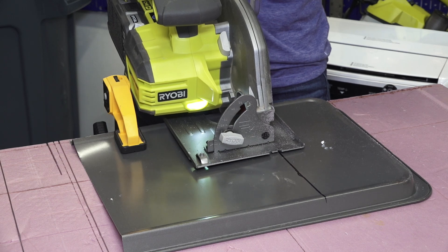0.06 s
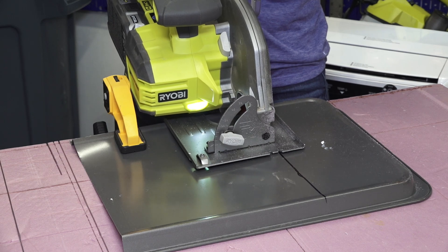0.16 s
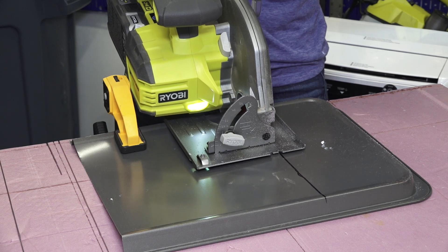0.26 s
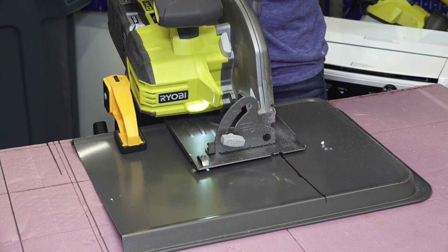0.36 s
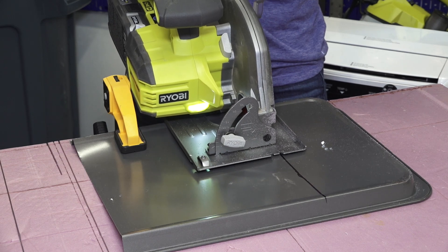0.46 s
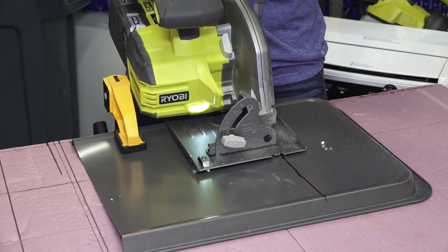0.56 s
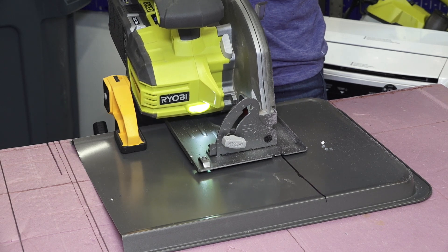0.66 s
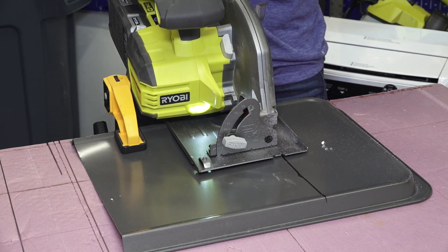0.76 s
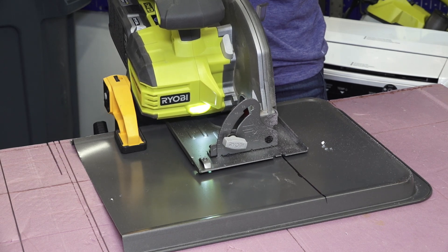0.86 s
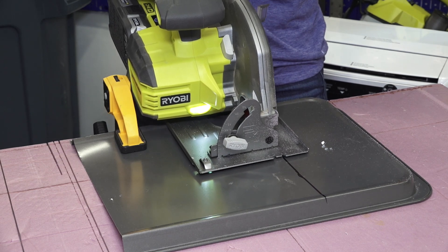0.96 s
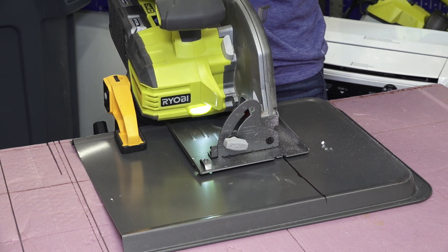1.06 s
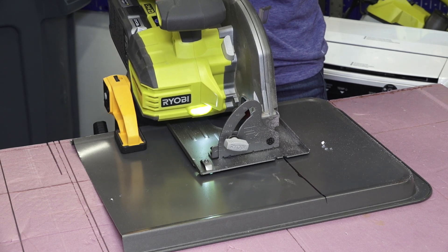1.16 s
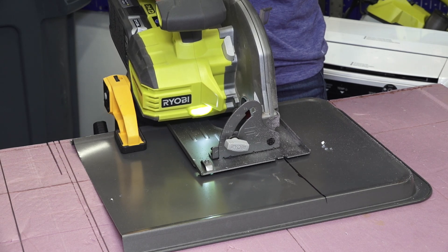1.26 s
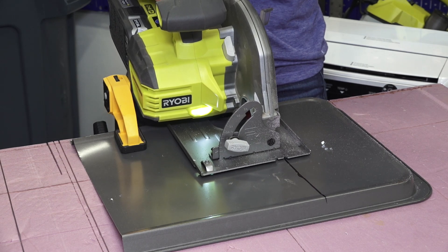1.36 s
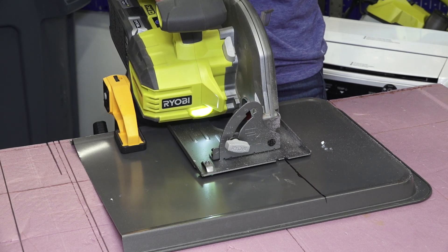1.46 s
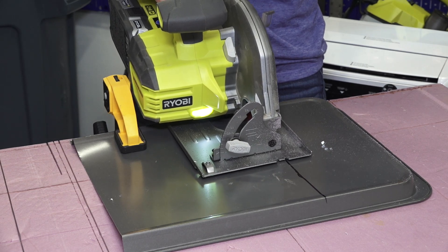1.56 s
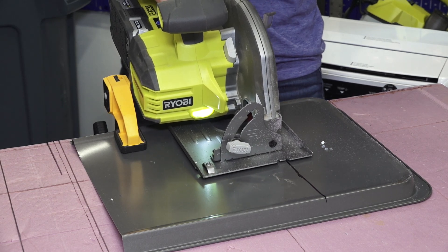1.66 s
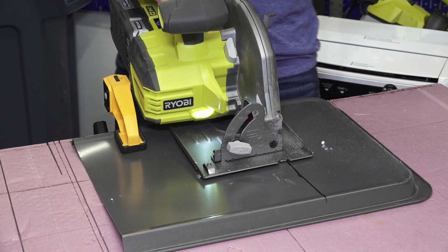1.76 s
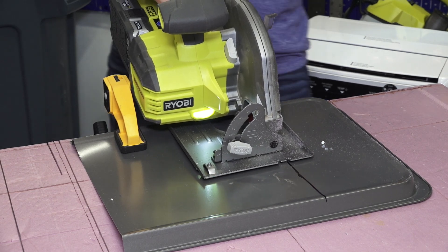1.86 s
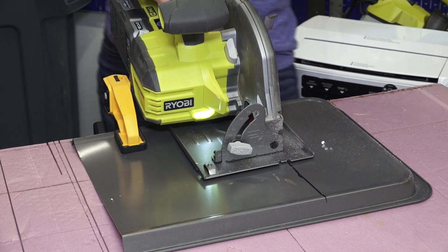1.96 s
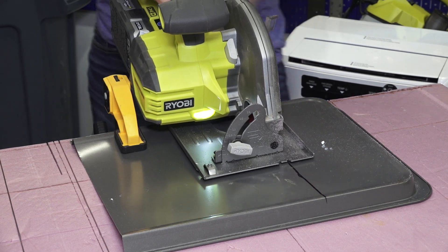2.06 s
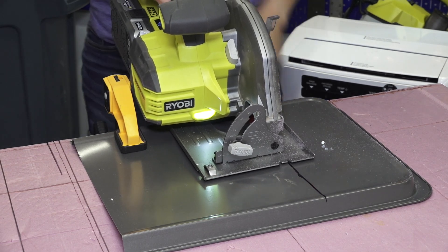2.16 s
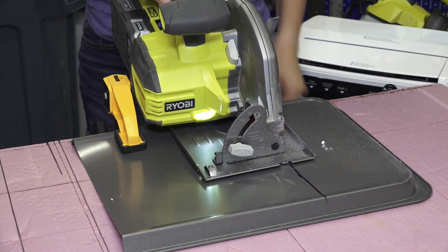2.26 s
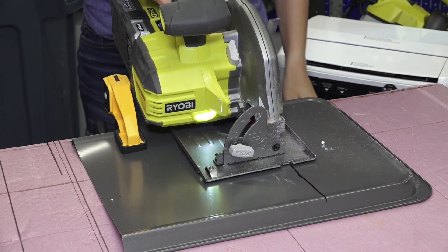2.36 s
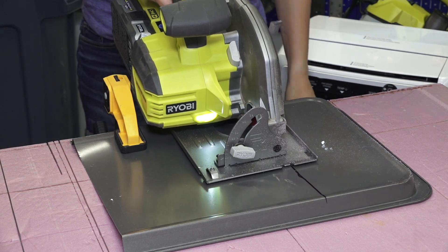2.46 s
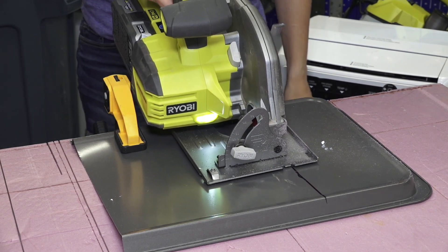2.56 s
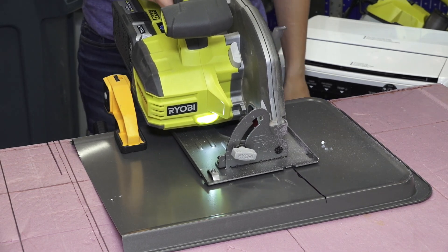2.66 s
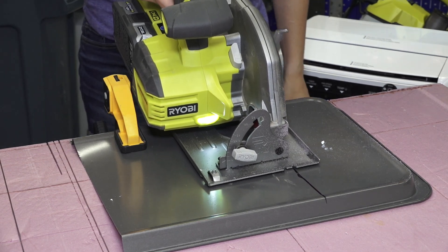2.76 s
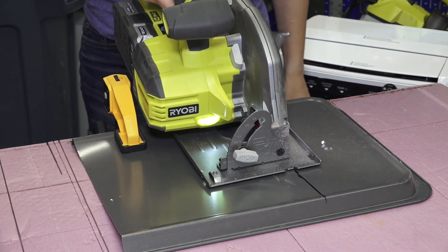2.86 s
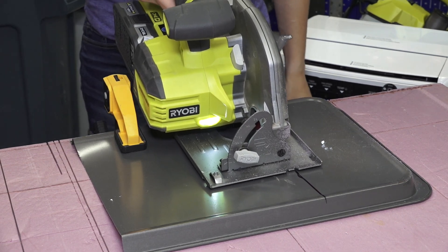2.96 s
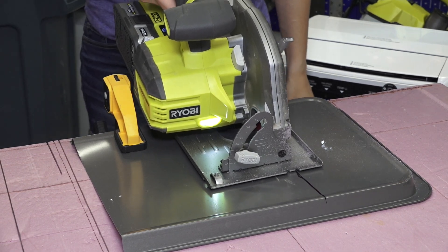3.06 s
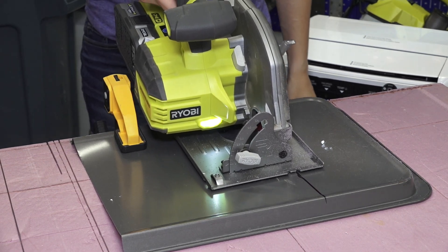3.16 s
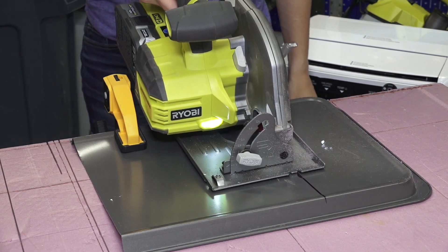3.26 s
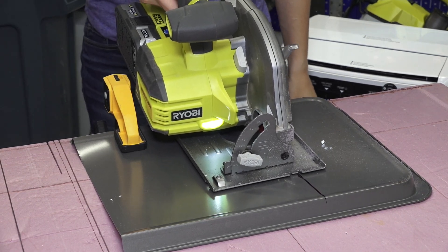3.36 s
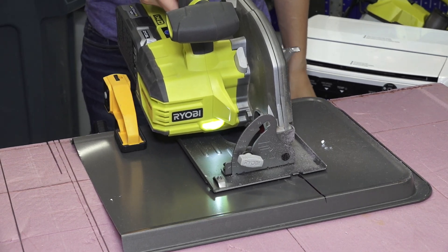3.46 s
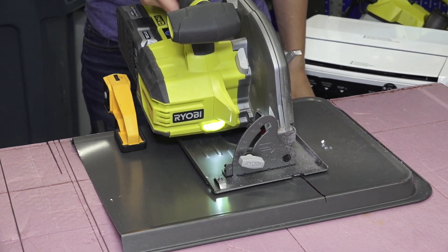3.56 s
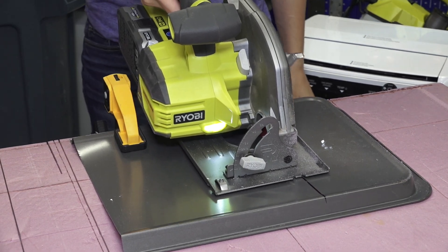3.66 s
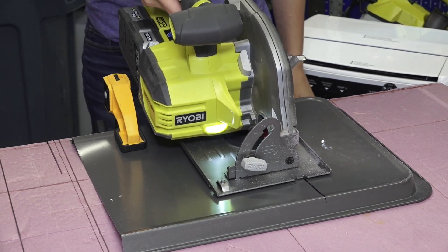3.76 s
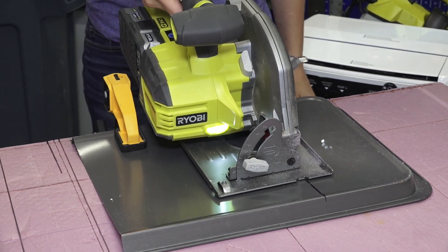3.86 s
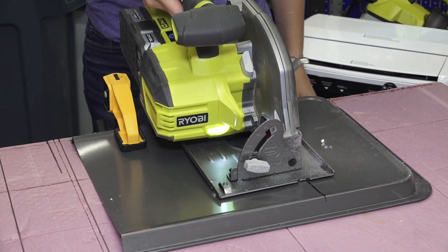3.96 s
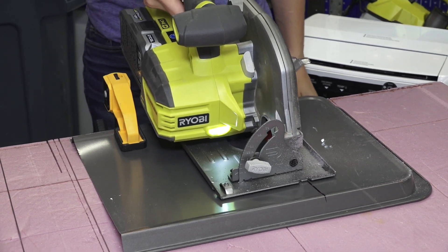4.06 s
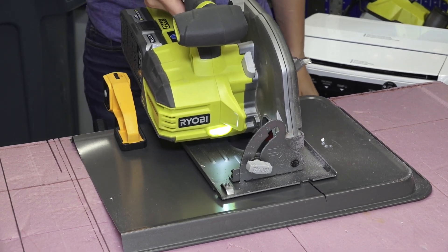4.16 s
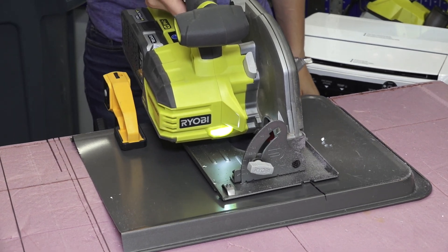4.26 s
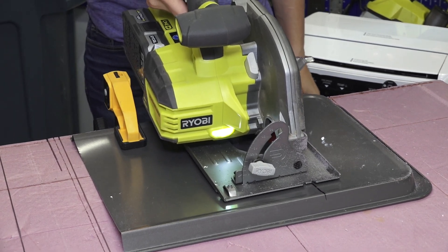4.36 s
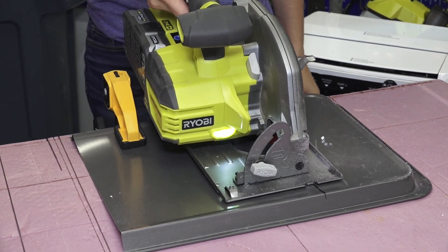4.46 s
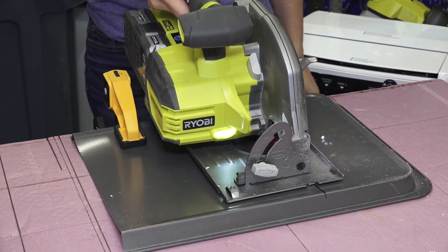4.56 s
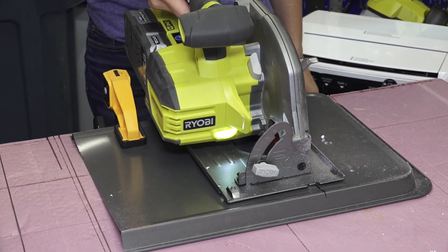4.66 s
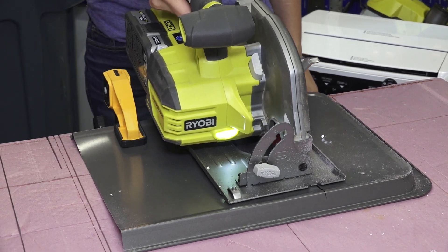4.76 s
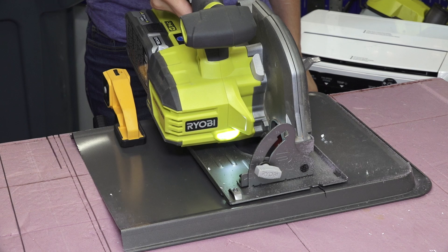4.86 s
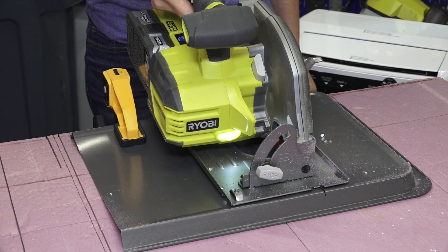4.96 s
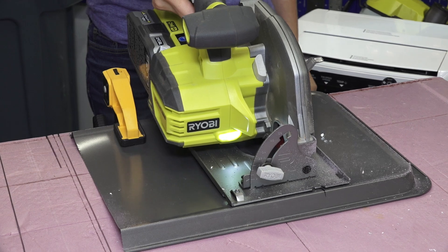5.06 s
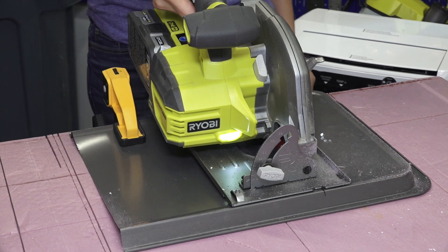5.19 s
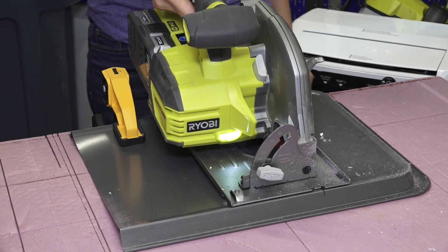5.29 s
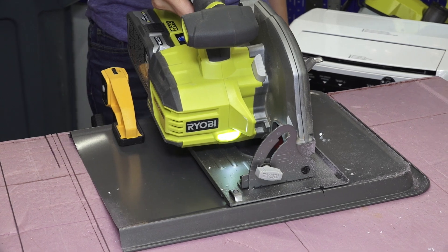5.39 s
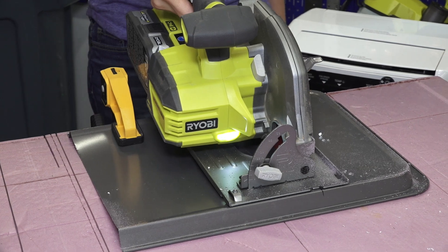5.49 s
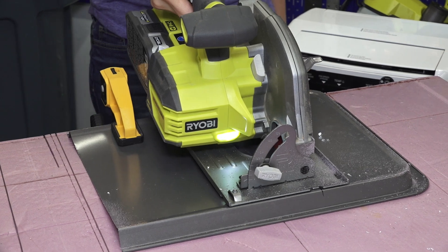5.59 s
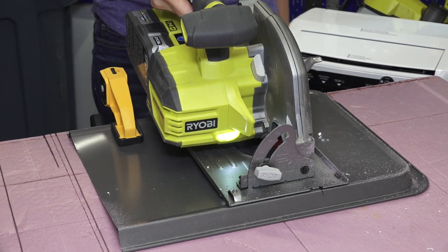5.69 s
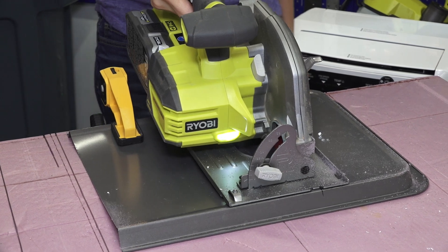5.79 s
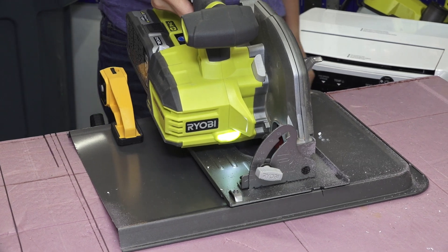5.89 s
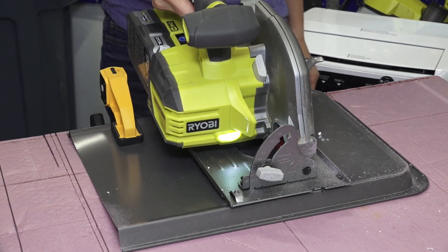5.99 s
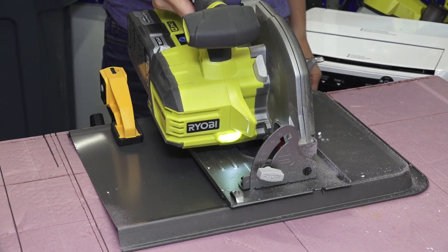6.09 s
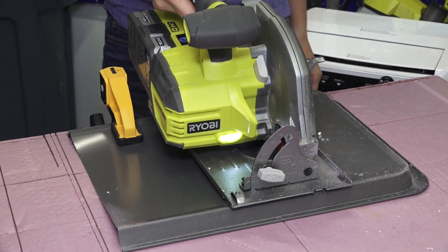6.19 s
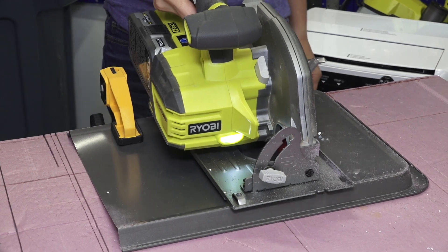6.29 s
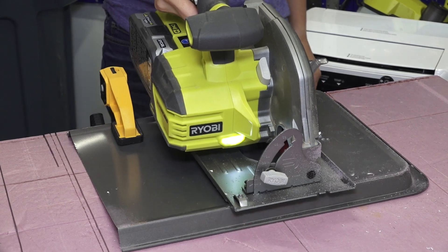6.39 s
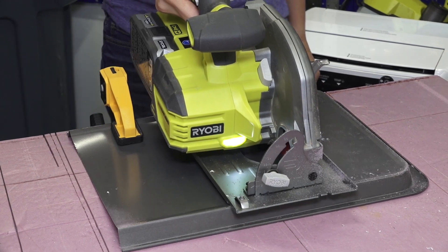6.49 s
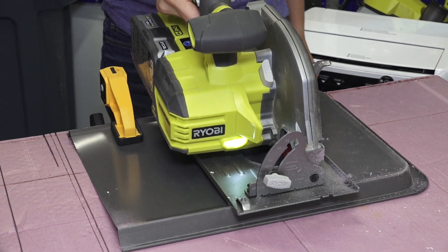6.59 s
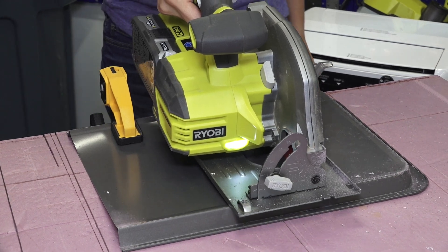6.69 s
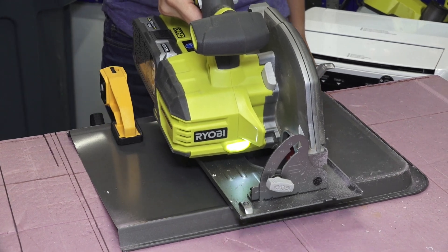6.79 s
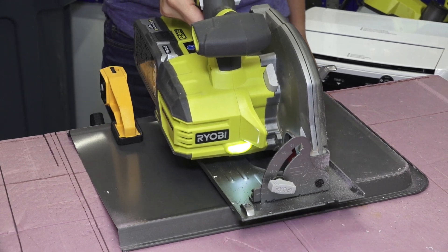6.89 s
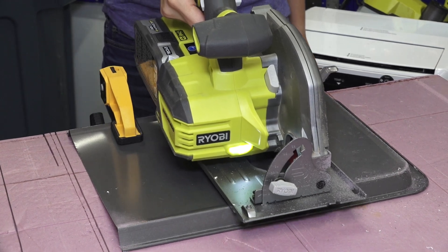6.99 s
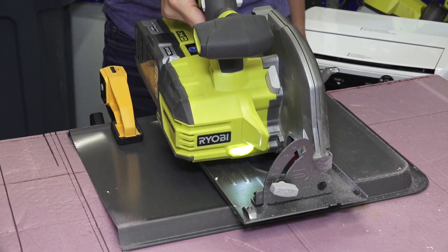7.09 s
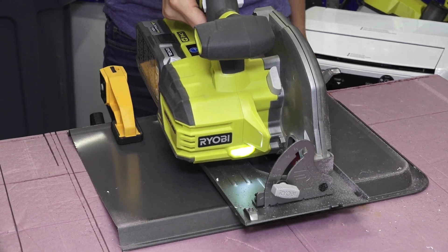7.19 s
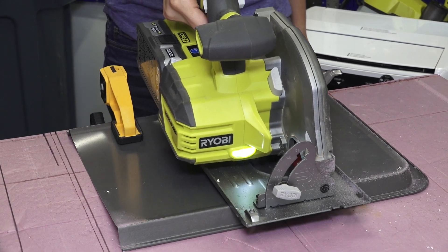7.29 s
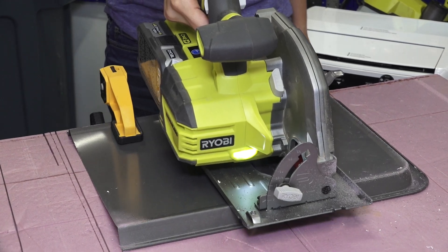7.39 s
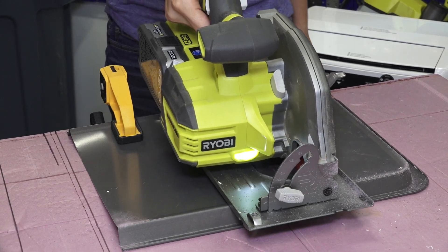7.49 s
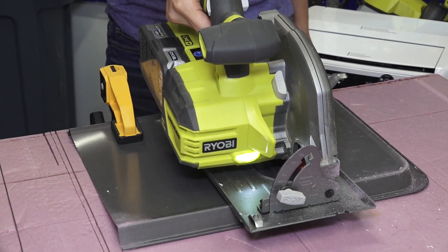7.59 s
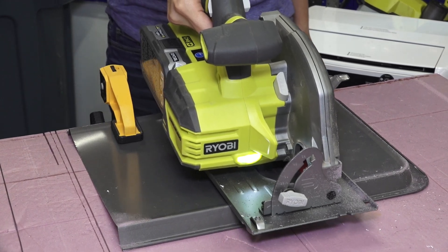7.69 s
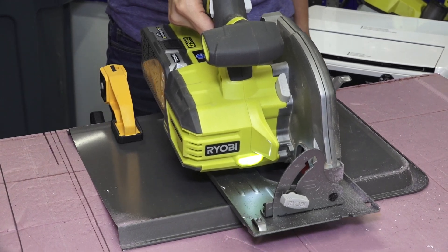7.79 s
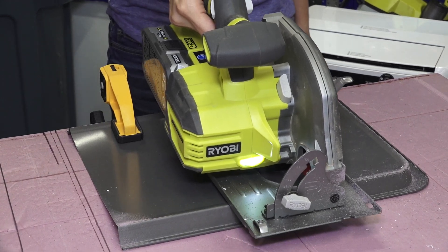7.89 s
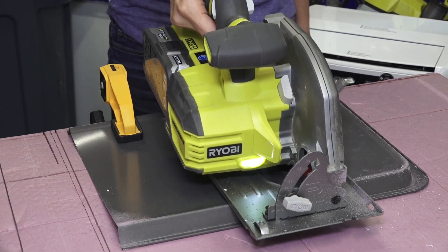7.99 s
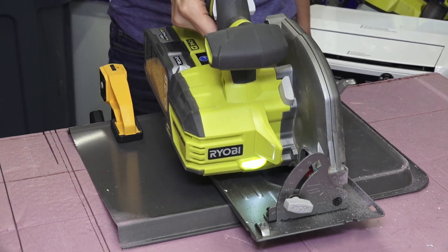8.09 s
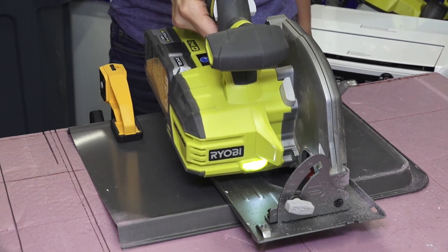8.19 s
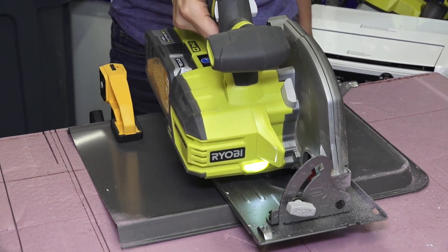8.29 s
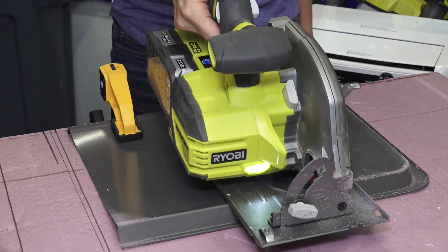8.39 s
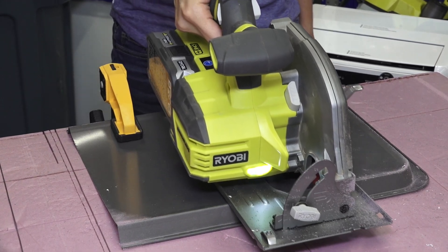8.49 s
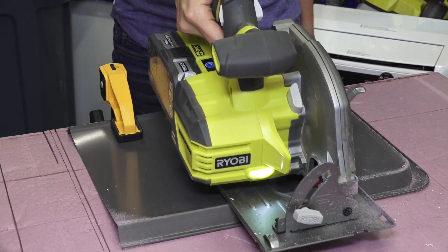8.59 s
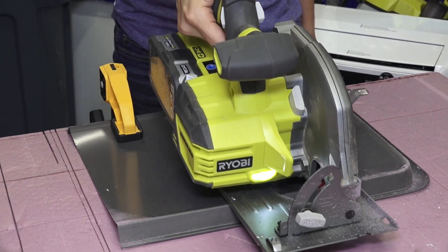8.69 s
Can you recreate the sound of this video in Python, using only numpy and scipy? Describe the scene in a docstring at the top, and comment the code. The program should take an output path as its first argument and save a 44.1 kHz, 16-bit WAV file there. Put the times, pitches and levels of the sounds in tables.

```python
"""Circular saw cutting a steel pan

A cordless saw with a 48-tooth blade is pushed through a thin steel pan in a small workshop, heard close up.
The teeth strike the sheet and whine; unequal teeth and blade wobble repeat every turn, so it buzzes
and throbs. As the blade bites deeper it slows, the chips rasp louder and the pan rattles."""
import sys
import numpy as np
from scipy import signal
from scipy.fft import rfft, irfft, next_fast_len
from scipy.io import wavfile
from scipy.ndimage import uniform_filter1d, minimum_filter1d, map_coordinates

SR = 44100
rng = np.random.default_rng(int(sys.argv[2]) if len(sys.argv) > 2 else 0)


def generate_wav(signal):
    """Clip the signal to [-1, 1] and save it as 16-bit WAV at the path in sys.argv[1]."""
    frames = np.transpose(np.atleast_2d(signal))
    scaled = np.clip(frames, -1, 1) * 32767
    pcm = np.round(scaled).astype(np.int16)
    wavfile.write(sys.argv[1], SR, pcm)


N = 385434
TIME = np.arange(N) / SR
TEETH, MAX_TURNS = 48, 512
FEED_CHANGES_PER_S = 15  # the hand pushes unevenly


def undb(db):
    """Turn decibels into a gain."""
    return 10 ** (np.asarray(db) / 20)


def curves(table):
    """Join the points of each column with straight lines in time."""
    times, *columns = np.transpose(table)
    return [np.interp(TIME, times, column) for column in columns]


def unit(x):
    """Scale a signal to an average power of 1."""
    return x / np.sqrt(np.mean(np.abs(x) ** 2))


def steady(x):
    """Even out the level over a few turns of the blade."""
    return x / np.sqrt(uniform_filter1d(np.abs(x) ** 2, size=3000))


def colour(x, points):
    """Shape the lows and highs by (pitch_hz, level_db) points; the result has power 1."""
    hz, db = np.transpose(points)
    size = next_fast_len(N)
    freqs = np.maximum(np.fft.rfftfreq(size, 1 / SR), 1)
    gain = undb(np.interp(np.log(freqs), np.log(hz), db))
    return unit(irfft(rfft(x, size) * gain, size)[:N])


def wander(per_second):
    """A smooth random drift, mostly between -1 and 1."""
    return map_coordinates(rng.standard_normal(4096), [TIME * per_second], order=2, mode="wrap")


def swell(start, end):
    """A rounded rise and fall between two times."""
    out, inside = np.zeros(N), (TIME > start) & (TIME < end)
    out[inside] = np.sin(np.pi * (TIME[inside] - start) / (end - start))
    return out


def tone(db, cycles):
    """A pure tone that follows a running count of cycles."""
    return np.sqrt(2) * undb(db) * np.sin(2 * np.pi * cycles)


def mix(repeating, loose, share):
    """Blend a part that repeats each turn with a part that never does."""
    share = np.clip(share, 0, 1)
    return np.sqrt(share) * repeating + np.sqrt(1 - share) * loose


def rim_noise(turns, memory_turns, per_turn):
    """Noise laid round the blade's rim: each turn sounds much like the last, but slowly changes."""
    keep = np.exp(-1 / memory_turns)
    fresh = rng.standard_normal((MAX_TURNS, per_turn))
    fresh[0] /= np.sqrt(1 - keep ** 2)
    marks = signal.lfilter([1], [1, -keep], fresh, axis=0).ravel()
    return unit(map_coordinates(marks, [turns * per_turn], order=3, mode="nearest"))


def scrape(turns, share, memory_turns):
    """The hiss of tearing metal, partly the same on every turn."""
    return mix(rim_noise(turns, memory_turns, per_turn=768), rng.standard_normal(N), share)


def workshop(x, fade_s=.2, level_db=-7):
    """Many short echoes come back from the bench and walls."""
    age = TIME[:SR // 2]
    tail = rng.standard_normal(len(age)) * (age > .003) * np.exp(-np.log(1000) * age / fade_s)
    return undb(level_db) * signal.fftconvolve(x, tail / np.linalg.norm(tail))[:N]


def bench(turns, angle, repeat, slowing, bite_db, eased_db):
    """The bench rumbles under load; the pan bumps on it and its loose end flaps once a turn."""
    # the tone of the rumble: pitch_hz, level_db
    rumble_shape = [(15, -20), (35, 1), (58, 1.5), (90, -2), (125, 0), (175, 3), (220, 2), (300, -1),
                    (400, 0), (900, -18)]
    # the pan bumps on the bench: start_s, end_s, level_db
    bumps = [(0.978, 1.14, -69), (1.54, 1.65, -73), (2.42, 2.56, -68), (2.603, 2.76, -66),
             (2.776, 3.02, -61), (3.58, 3.94, -55), (4.28, 4.6, -62.5), (4.853, 4.983, -63),
             (6.04, 6.18, -76), (6.47, 6.638, -61.5), (8.152, 8.623, -67)]
    load = undb(-75.5 + 4 * slowing + 0.97 * bite_db - 2.9 * eased_db)
    bumping = sum(undb(db) * swell(start, end) for start, end, db in bumps)
    rumble = colour(scrape(turns, 0.68 * repeat, memory_turns=36), rumble_shape)
    flap = swell(8.12, 8.65) * tone(db=-68, cycles=angle / (2 * np.pi))
    return np.hypot(load, bumping) * rumble + flap


def drive(turns):
    """The unbalanced blade, the gears and the motor hum and whistle in step with the blade."""
    # their tones: cycles_per_turn, level_db
    tones = [(1, -94.5), (6, -83.5), (21, -76.5), (85.5, -64), (171, -71.5)]
    return sum(tone(db + 2 * wander(6), per_turn * turns + rng.random()) for per_turn, db in tones)


def pan_rings():
    """The scraping shakes the sheet, which rings at new pitches as its free part changes."""
    # the sheet's notes: start_s, end_s, pitch_hz, level_db
    notes = [(-.3, 0.51, 1102, -62.5), (-.2, 0.62, 1400, -70), (0, 0.5, 1626, -61), (-.3, 0.63, 355, -70),
             (1.06, 3.3, 337, -79), (.6, 2.4, 506, -71), (1.65, 2.4, 1283, -65), (1.7, 4.2, 732, -74),
             (2.5, 4.4, 1130, -75), (3, 3.4, 1512, -52), (3, 3.66, 1796, -54), (4.5, 4.9, 392, -67.5),
             (5, 5.8, 1650, -71), (7.8, 8.5, 555, -66), (7.9, 8.3, 772, -66.5), (8, 8.45, 1114, -61.5),
             (7, 11, 1513, -73), (7.5, 9.7, 2210, -57)]
    out, shake = 0, unit(1 + .8 * (wander(70) + 1j * wander(70)))
    for k, (start, end, hz, db) in enumerate(notes):
        ring = np.real(np.roll(shake, k * SR // 2) * np.exp(2j * np.pi * hz * TIME))
        out += np.sqrt(2) * undb(db) * swell(start, end) * ring
    return out


def pan_clatter(turns, repeat, rasp_db, eased_db, fade_db_per_s=0.77):
    """The pan clatters with the bite, less and less as the saw nears its stiff rim."""
    # the tone of the clatter: pitch_hz, level_db
    clatter_shape = [(200, -26), (290, -16.5), (335, -3), (420, -3), (560, -2.5), (750, 0), (1100, 0.5),
                     (1500, 2.5), (2000, 0), (2500, -2.5), (4000, -14)]
    gain = undb(rasp_db - 9 - fade_db_per_s * TIME - 0.3 * eased_db)
    return gain * colour(scrape(turns, repeat, memory_turns=19), clatter_shape)


def rubs():
    """The sheet lifts and rubs on the side of the blade in short, hoarse scrapes; chips catching and bursting
    in the teeth add brief bursts high in the treble."""
    # each scrape: start_s, end_s, low_hz, high_hz, level_db
    touches = [(.05, .5, 950, 1820, -62.5), (3.164, 3.277, 310, 410, -58), (3.17, 3.353, 1100, 2420, -56),
               (3.58, 3.72, 4000, 14000, -44), (3.97, 4.104, 724, 1900, -47),
               (4.02, 4.17, 3000, 13000, -43), (4.56, 4.69, 560, 1720, -52.5),
               (4.862, 4.983, 500, 2400, -54), (5.07, 5.135, 800, 2400, -53), (5.06, 5.14, 3000, 9000, -49),
               (5.36, 5.567, 6400, 14000, -42), (5.294, 5.6, 1190, 2300, -55.5),
               (5.797, 6.1, 1300, 1730, -62), (8.064, 8.48, 1360, 1630, -54.5)]
    out, noise = 0, rng.standard_normal(N)
    for start, end, low_hz, high_hz, db in touches:
        band = signal.butter(2, [low_hz, high_hz], "band", fs=SR, output="sos")
        out += undb(db) * swell(start, end) * unit(signal.sosfilt(band, noise))
    return out


def snag(start_s=.1235, level_db=-25.5, decay_s=0.011):
    """A tooth snags the sheet: one sharp clack that dies quickly in the pan and blade guard."""
    # the tone of the clack: pitch_hz, level_db
    clack_shape = [(40, -25), (120, -10), (400, -4), (1500, -8), (2700, 1), (4000, -3), (5400, 8),
                   (6600, -4.5), (8000, 11), (11000, -13), (16000, -6)]
    age = TIME - start_s
    fade = (age > 0) * np.exp(-np.abs(age) / decay_s)
    return undb(level_db) * fade * colour(rng.standard_normal(N), clack_shape)


def singing():
    """As the blade breaks out of the pan, the cut no longer damps it and it sings."""
    # the freed blade's notes: start_s, end_s, pitch_hz, level_db
    notes = [(8.17, 8.64, 5440, -42.5), (8.1, 8.42, 10775, -40.5), (8.08, 8.44, 13470, -50),
             (8.44, 8.63, 13445, -38.5)]
    return sum(swell(start, end) * tone(db, hz * TIME) for start, end, hz, db in notes)


def chatter(turns, throb):
    """The blade briefly chatters on every second tooth, an octave below the whine."""
    return throb * swell(1.65, 2.4) * tone(db=-62, cycles=TEETH / 2 * turns)


def sheet_echoes(x):
    """Waves bounce back from the pan's edges; their strengths drift as the cut grows."""
    delays = rng.integers(SR // 1000, SR // 110, size=8)
    return x + .19 * sum(wander(1.2) * np.roll(x, delay) for delay in delays)


def chip_breaks(per_second, decay_s):
    """Chips jam and break in sudden bursts of uneven size, averaging 1."""
    hits = (rng.random(N) < per_second / SR) * rng.exponential(size=N)
    bursts = signal.lfilter([1], [1, -np.exp(-1 / (decay_s * SR))], hits)
    return bursts / bursts.mean()


def chips(turns, repeat, throb):
    """Each tooth tears off a chip, making a pulsing, crackling rasp that rings the blade."""
    # the blade's own notes: pitch_hz, width_hz, level_db (compared with the rasp)
    blade_notes = [(2330, 22, -22), (3340, 90, -13), (4133, 53, -4.5), (6080, 25, -17), (6860, 62, -4),
                   (7510, 100, -0.5), (10260, 67, -2), (11140, 280, -20), (15300, 200, 4)]
    # the tone of the rasp: pitch_hz, level_db
    rasp_shape = [(1200, -18.5), (2300, -0.5), (3700, -1), (4900, 2), (6500, 2), (7500, 3.5), (9000, 1),
                  (9900, 4.5), (11500, 1.5), (12800, 1), (14600, -2), (15600, -7)]
    pulses = 1 + 0.23 * np.cos(2 * np.pi * TEETH * turns)
    cracks = np.sqrt(1 + 0.44 * chip_breaks(per_second=74, decay_s=0.0067))
    tearing = steady(sheet_echoes(scrape(turns, 0.87 * repeat, memory_turns=6)))
    rasp = tearing * pulses * throb * cracks
    ringing = sum(undb(db) * signal.lfilter(*signal.iirpeak(hz, hz / width, SR), rasp)
                  for hz, width, db in blade_notes)
    return colour(rasp + ringing, rasp_shape)


def throbbing(angle, slowing):
    """The blade wobbles: once a turn it digs in quickly and lets go slowly."""
    # wobbles in the cut: start_s, end_s, extra_depth, judder (a shake every second turn)
    wobbles = [(-1.2, 2.1, .24, 0), (2.6, 3.02, .33, 0), (3.3, 3.75, .2, 0), (5.2, 5.6, 0, .14),
               (5.6, 5.95, .3, .08), (6, 6.38, .42, .35), (8.35, 8.65, .2, 0)]
    depth = np.maximum(0.044 - 0.019 * slowing, 0)  # a free-running blade throbs more
    depth += sum(extra * swell(start, end) for start, end, extra, _ in wobbles)
    judder = sum(amount * swell(start, end) for start, end, _, amount in wobbles)
    dig = np.cos(angle) - .33 * np.sin(2 * angle) - .11 * np.cos(3 * angle)
    return np.exp(depth * dig - judder * np.cos(angle / 2))


def uneven_teeth(turns, share, width_hz=91, memory_turns=17.5):
    """Teeth differ in bite and timing (held as one complex number); neighbours are alike."""
    worn = rim_noise(turns, memory_turns, TEETH) + 1j * rim_noise(turns, memory_turns, TEETH)
    chance = rng.standard_normal((2, MAX_TURNS * TEETH))
    loose = np.interp(turns * TEETH, np.arange(chance.shape[1]), chance[0] + 1j * chance[1])
    smoothing = np.exp(-2 * np.pi * width_hz / SR)
    return steady(signal.lfilter([1], [1, -smoothing], mix(unit(worn), unit(loose), share)))


def whine_levels(slowing, bite_db, eased_db, waver_db=1.1, drain=0.054):
    """Each harmonic of the whine grows louder under load; one that squeals drains the others."""
    # harmonics 1 to 5: usual_level_db, db_per_lost_turn_per_s, db_per_bite_db
    harmonics = [(-54, 1.0, 0.3), (-51, 1.4, 0.25), (-48.5, 1.27, 0.13), (-52, 0.95, 0.25),
                 (-51.5, 1.3, 0.28)]
    # a harmonic meets a note of blade and sheet and squeals: start_s, end_s, harmonic, boost_db
    squeals = [(0.456, 0.851, 2, 1.5), (.48, 0.801, 5, 2), (0.918, 1.3, 3, 5.5), (1.0, 1.318, 4, 5.5),
               (1.098, 1.85, 2, 2.5), (1.42, 1.78, 5, 3), (1.48, 1.8, 4, 3), (1.922, 2.15, 4, 5),
               (2.36, 2.562, 1, 5.5), (2.3, 2.8, 5, 6.5), (2.42, 2.625, 3, 4.5), (2.6, 3.12, 2, 5),
               (2.68, 3.02, 3, 4), (2.748, 3.15, 4, 6), (2.92, 3.327, 1, 3), (3.3, 3.72, 4, 4.5),
               (3.295, 3.52, 5, 6.5), (3.652, 3.89, 2, 10.5), (3.8, 4.0, 4, 5), (3.798, 3.95, 5, 0),
               (4.2, 4.46, 3, 7), (4.36, 4.53, 1, 6), (4.383, 4.537, 4, 5.5), (4.25, 4.55, 5, 3),
               (4.62, 5.0, 5, 4.5), (4.78, 5.198, 1, 2.5), (4.842, 4.99, 3, 6), (4.8, 5.17, 2, 5),
               (5.6, 6.08, 1, 5), (5.85, 6.17, 3, 1.5), (6.02, 6.158, 4, 4.5), (6.25, 6.45, 3, 4),
               (6.306, 6.65, 2, 6), (6.7, 6.98, 3, 4), (7.0, 7.35, 5, 1), (7.39, 7.54, 3, 6.5),
               (7.48, 7.72, 2, 10), (7.721, 8.0, 2, 6.5), (8.38, 8.58, 2, 6.5), (8.598, 8.86, 2, 10.5),
               (8.624, 8.86, 1, 6.5), (8.48, 8.859, 4, 6.5)]
    levels = [db + per_slowing * slowing + per_bite * bite_db - eased_db
              + waver_db * wander(FEED_CHANGES_PER_S) for db, per_slowing, per_bite in harmonics]
    boosts = np.zeros((len(levels), N))
    for start, end, harmonic, db in squeals:
        boosts[round(harmonic) - 1] += db * swell(start, end) ** .8  # locks in quickly and holds
    total = boosts.sum(axis=0)
    levels = [db + own - drain * (total - own) for db, own in zip(levels, boosts)]
    return levels + [levels[-1] - 10]  # the sixth harmonic follows the fifth


def whine(turns, angle, repeat, throb, purity_db, levels):
    """Tooth strikes make harmonics, tones at multiples of their rate; loud ones are clean, weak ones buzz."""
    # how clean harmonics 1 to 6 are: extra_purity_db
    extra_purity = [1, -0.5, -10, -1, -14, -17]
    strike = 2 * np.pi * TEETH * (turns + 0.00033 * wander(30))
    strike += 0.13 * np.sin(angle)  # an off-centre blade strikes a little early, then a little late
    out, pulsing = 0, throb ** 1.6
    for k, (db, extra_db) in enumerate(zip(levels, extra_purity), 1):
        clean_share = 1 / (1 + undb(-2 * (purity_db + extra_db + .8 * (db + 48))))
        buzz = uneven_teeth(turns, share=0.66 + 0.35 * repeat)
        buzz *= np.exp(-2j * np.pi * turns)  # the flexing sheet favours buzz just below the tone
        core = 1 + (k == 1) * 0.34 * np.exp(-2j * angle)  # a slightly oval blade splits the lowest tone
        strength = steady(mix(core, buzz, clean_share) * pulsing)
        out += undb(db) * np.sqrt(2) * np.real(strength * np.exp(1j * k * strike))
    return undb(2.5) * out


def scene(usual_turns_per_s=56, usual_rasp_db=-43, high_spot_turns=.17):
    """The speed of the blade and the depth of its bite steer the sound of the cut."""
    # blade speed: time_s, turns_per_s
    speeds = [(0.0, 58.31), (0.91, 57.28), (1.44, 56.15), (2.04, 55.76), (2.36, 56.24), (2.63, 55.21),
              (2.95, 55.67), (3.29, 54.06), (3.7, 54.69), (4.11, 53.64), (4.57, 55.35), (4.76, 56.84),
              (5.08, 56.4), (5.59, 58.56), (5.86, 58.48), (6.09, 56.97), (6.47, 55.71), (7.01, 55.22),
              (7.28, 55.9), (7.8, 55.2), (8.19, 56.07), (8.74, 56.07)]
    # depth of the bite, as the loudness of the chips: time_s, level_db
    bites = [(0, -47), (.6, -47.5), (1.3, -49.5), (2.3, -47.5), (2.9, -45.5), (3.07, -33.5), (3.25, -36.5),
             (3.42, -41.3), (3.7, -38.5), (4.1, -37), (4.72, -43), (5.28, -45), (5.8, -44.5), (6.5, -38.5),
             (6.95, -38), (7.54, -37.8), (7.96, -42.5), (8.22, -39), (8.5, -41), (8.65, -48.5),
             (8.74, -46.5)]
    # how evenly the blade runs: time_s, repeat (0-1, how alike the turns are), purity_db (of the whine)
    evenness = [(0, .38, -15), (.6, 0.77, 2), (1.2, 0.67, -3), (2, 1, -12), (2.45, 0.85, 0.5),
                (2.85, 0.8, -1.5), (3.7, 0.4, 0), (4.1, .05, -2), (4.5, 0.6, 2), (4.8, .1, -2.5),
                (5.6, 0.22, 10), (6, 0.01, 2.5), (7.1, .05, -0.5), (7.6, 0.2, 4.5), (8.25, 0.45, 5),
                (8.74, 0.05, 5.5)]
    # the push eases and the teeth barely shake the sheet: start_s, end_s, whine_drop_db
    eases = [(1.776, 2.298, 3), (4.58, 4.858, 2), (5.3, 5.478, 2.5), (5.497, 5.876, 7), (7.956, 8.167, 2.5),
             (8.594, 8.727, 5)]
    spin = curves(speeds)[0]
    rasp_db = curves(bites)[0] + .5 * wander(FEED_CHANGES_PER_S)
    repeat, purity_db = curves(evenness)
    turns = np.cumsum(spin) / SR
    angle = 2 * np.pi * (turns - high_spot_turns)
    slowing, bite_db = usual_turns_per_s - spin, rasp_db - usual_rasp_db
    eased_db = sum(db * swell(start, end) for start, end, db in eases)
    throb = throbbing(angle, slowing)

    body = undb(rasp_db) * chips(turns, repeat, np.sqrt(throb))
    body += pan_clatter(turns, repeat, rasp_db, eased_db)
    body += bench(turns, angle, repeat, slowing, bite_db, eased_db)
    body += pan_rings() + rubs() + drive(turns)
    blade = whine(turns, angle, repeat, throb, purity_db, whine_levels(slowing, bite_db, eased_db))
    blade += chatter(turns, throb) + singing() + snag()
    echoes = workshop(body + blade / 2)  # the blade beams at the microphone, so less reaches the walls
    return np.tile(undb(-0.56) * (body + blade + echoes), (2, 1))


def record(dry, limit_db=-28.7, top_hz=15750):
    """A fast limiter turns down the loudest peaks, and the highest treble is cut."""
    gain = np.minimum(1, undb(limit_db) / (np.abs(dry) + 1e-9))
    gain = uniform_filter1d(minimum_filter1d(gain, size=41), size=41)
    treble_cut = signal.ellip(10, .05, 60, top_hz, fs=SR, output="sos")
    return signal.sosfiltfilt(treble_cut, dry * gain)


dry = scene()
out = record(dry)
generate_wav(out)
```